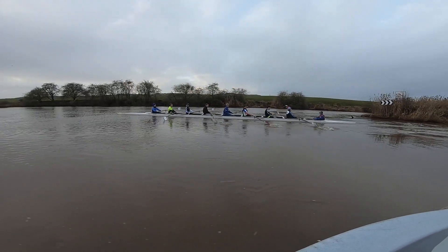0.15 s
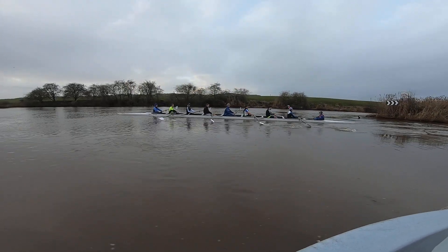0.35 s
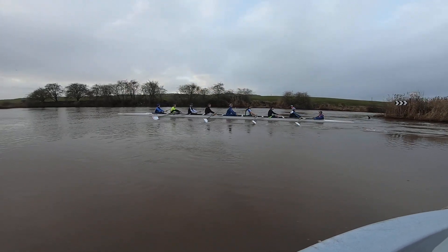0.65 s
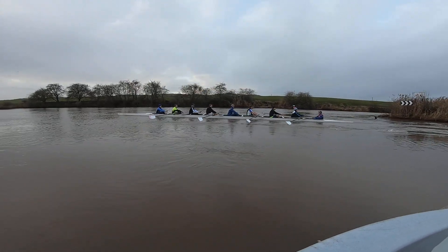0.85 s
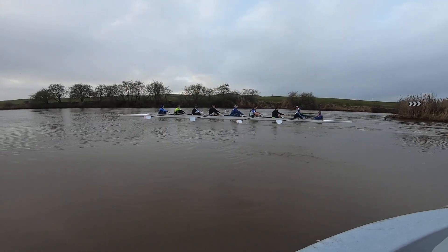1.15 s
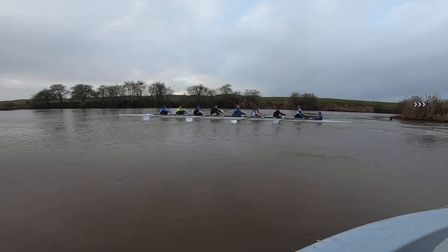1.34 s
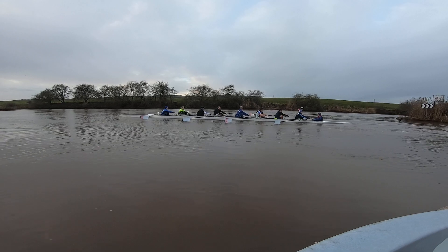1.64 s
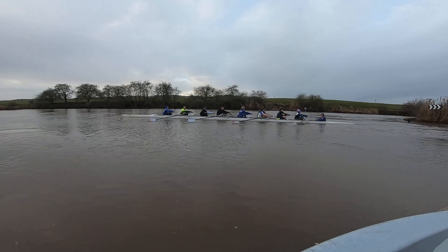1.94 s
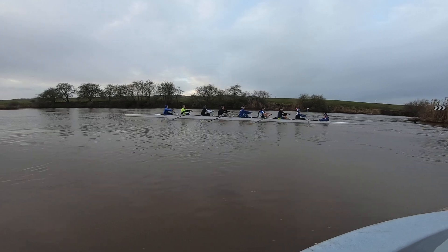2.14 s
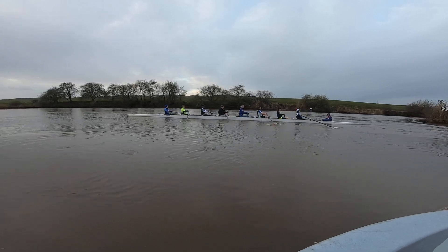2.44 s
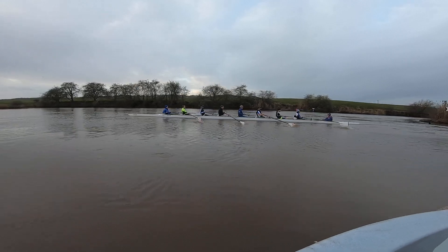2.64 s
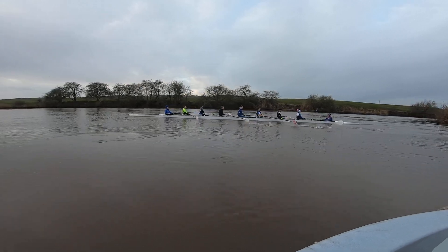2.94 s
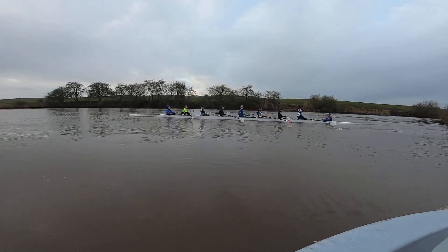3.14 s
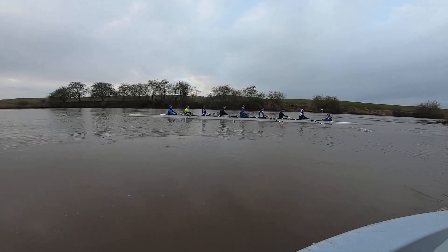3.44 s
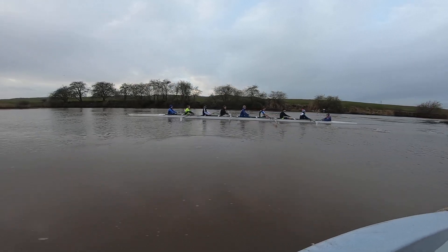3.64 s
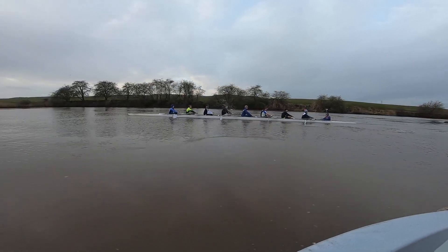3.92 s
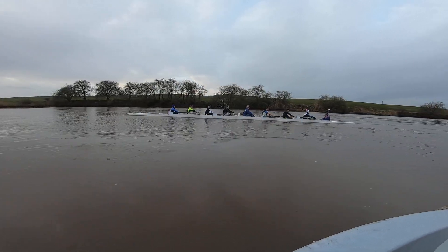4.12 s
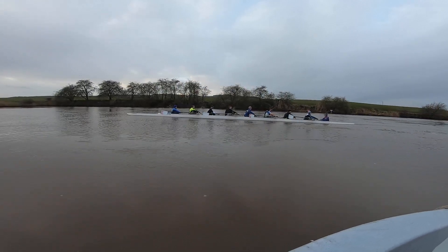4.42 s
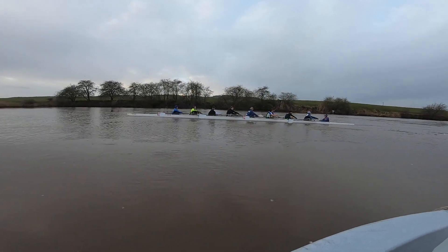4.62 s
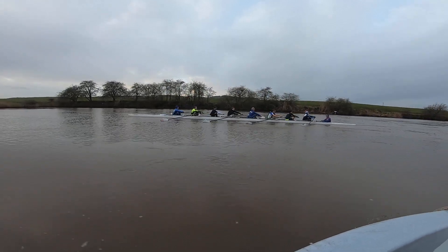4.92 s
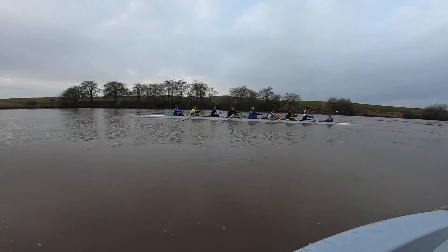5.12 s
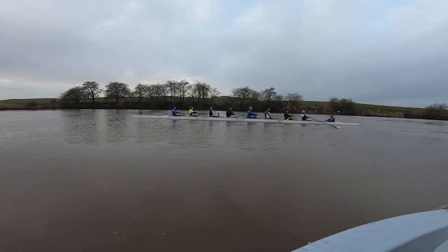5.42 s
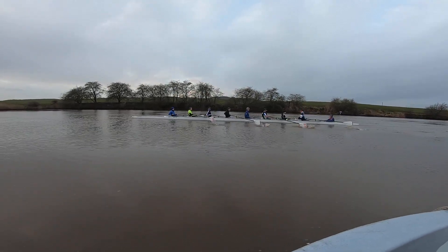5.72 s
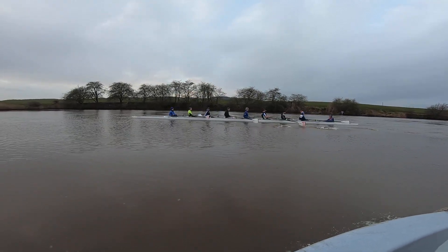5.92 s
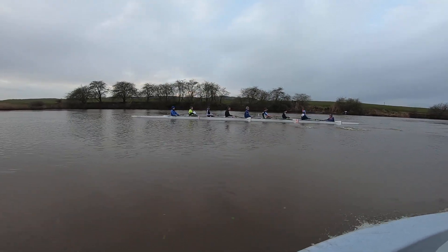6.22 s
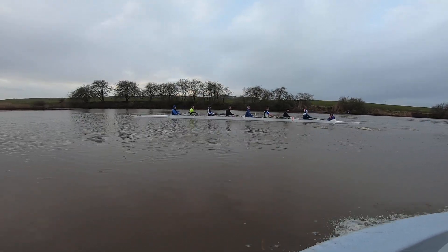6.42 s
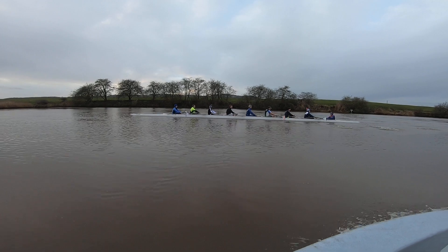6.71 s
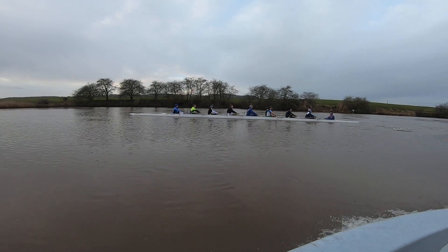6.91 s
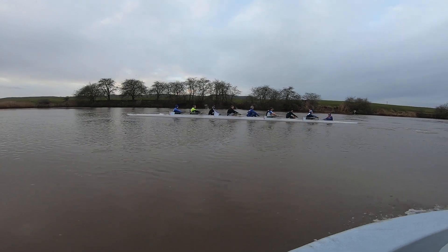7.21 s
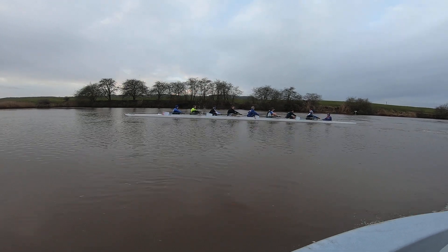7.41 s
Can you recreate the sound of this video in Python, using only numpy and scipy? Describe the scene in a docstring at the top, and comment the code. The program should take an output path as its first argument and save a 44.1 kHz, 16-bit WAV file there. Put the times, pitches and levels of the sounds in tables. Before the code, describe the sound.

Heard from aboard a motorboat: an even droning engine, short buffets of low wind, a soft wake hiss and a few close drops of spray.

```python
"""An outboard engine on a calm river, heard in the boat: five firing orders as phase-locked sines,
weak extra lines (half orders from unequal cylinders and a faint sixth order), and the propeller's beat.
Wind rumbles on the microphone port: three bands of low noise, lifted by short gusts.
The wake rushes along the hull: noise plus bubbles in three bands. A few drops of spray patter close by,
each a damped ring with short noise bursts."""
import sys
import numpy as np
from scipy import signal
from scipy.fft import rfft, irfft, next_fast_len
from scipy.io import wavfile
from scipy.ndimage import uniform_filter1d, map_coordinates

SR = 44100
rng = np.random.default_rng(int(sys.argv[2]) if len(sys.argv) > 2 else 0)


def file_out(sig):
    """Save sig as 16-bit WAV at sys.argv[1]."""
    # one column per channel
    cols = np.atleast_2d(sig).T
    # limit, then scale
    lim = np.clip(cols, -1, 1)
    pcm = np.round(lim * 32767).astype(np.int16)
    wavfile.write(sys.argv[1], SR, pcm)


N = 333396


def amp(db):
    """dB to gain."""
    return 10 ** (np.asarray(db) / 20)


def unit(x):
    """Scaled to rms 1."""
    return x / np.sqrt(np.mean(x ** 2) + 1e-20)


def curves(rows):
    """One value per sample for each column after the time."""
    knot_s, *columns = np.transpose(rows)
    return [np.interp(np.arange(N) / SR, knot_s, column) for column in columns]


def wobble(rate_hz):
    """Smooth random curve through rate_hz normal knots a second."""
    knots = rng.standard_normal(int(N * rate_hz / SR) + 4)
    return map_coordinates(knots, [np.arange(N) * rate_hz / SR])


def filtered(x, response):
    """x times a zero-phase response of frequency."""
    m = next_fast_len(N + 8192)
    return irfft(rfft(x, m) * response(np.fft.rfftfreq(m, 1 / SR)), m)[..., :N]


def coloured(x, points):
    """x through (frequency [Hz], gain [dB]) points on a log axis, then rms 1."""
    hz_points, db_points = np.transpose(points)

    def response(hz):
        return amp(np.interp(np.log(hz + 1), np.log(hz_points + 1), db_points))

    return unit(filtered(x, response))


def patchy(depth_db):
    """White noise with time-frequency patches of random gain."""
    z = signal.stft(rng.standard_normal(N + 512), nperseg=512)[2]
    field = uniform_filter1d(rng.standard_normal(z.shape), size=8, axis=0)
    field = uniform_filter1d(field, size=12, axis=1)
    return signal.istft(z * amp(depth_db * unit(field)), nperseg=512)[1][:N]


def bubbles(count, hz, spread, cycles, scatter_db):
    """Random bubbles: short damped sines whose pitch rises as they surface."""
    draw = rng.random((count, 2))
    pitch_hz = hz * np.exp(spread * rng.standard_normal((count, 1)))
    i = np.arange(400)
    u = i * pitch_hz / SR / cycles
    wave = np.sin(2 * np.pi * cycles * (u + 0.088 * u * u)) * u * np.exp(-3 * u)
    wave = wave * amp(-scatter_db * np.log(1 - .98 * draw[:, 1:]))  # a few much louder
    at = (draw[:, :1] * N).astype(int) + i
    return unit(np.bincount(at.ravel(), wave.ravel(), N + 400)[:N])


# Engine firing rate: (time [s], rate [Hz])
FIRING_RATE = [(0, 66.22), (.5, 66.2), (1.65, 66.14), (2.45, 64.77), (3.9, 63.8), (4.6, 64.3), (5.1, 63.92),
               (6.4, 63.38), (7.3, 63.37), (7.56, 63.7)]


def engine():
    """All lines run on one firing phase, the integral of the firing rate plus slight jitter."""
    turn = 2 * np.pi * (np.cumsum(curves(FIRING_RATE)[0]) / SR + .012 * wobble(12))
    return np.sqrt(2) * (firing_orders(turn) + weak_orders(turn) + propeller(turn))  # rms to peak


def exhaust_lag(order):
    """Phase [rad]: the exhaust delays the high orders more than the low ones."""
    return 1.1 - .52 * (order - 1) ** 2


# First order, swelling as the boat rocks: (time [s], level [dB])
FIRST_ORDER = [(0, -23.5), (.3, -20.5), (.85, -20.5), (1.05, -23), (1.65, -21.5), (1.98, -16.5),
               (2.5, -17.5), (2.9, -20), (3.25, -17), (3.62, -15.5), (3.85, -21), (4.12, -16.5),
               (4.17, -22), (4.75, -20.5), (4.9, -18), (5.3, -18), (5.75, -20), (6.1, -20), (6.45, -17.5),
               (7.1, -18), (7.27, -22), (7.56, -19.5)]
# Upper orders: (time [s], third level [dB], fourth level [dB], fifth level [dB])
UPPER_ORDERS = [(0, -31.5, -33, -35.5), (.7, -31, -33, -35.5), (1.15, -27, -27, -34),
                (1.75, -25, -25.5, -35), (2.4, -24.5, -28.5, -34), (2.85, -24, -35.5, -44),
                (3.75, -22.5, -33.5, -41.5), (4.5, -28.5, -30.5, -38.5), (4.9, -25, -32, -41),
                (5.35, -30, -31, -39), (6.2, -28, -36.5, -41), (6.65, -21.5, -34, -37.5),
                (7.15, -27, -26, -34.5), (7.56, -26, -26, -32.5)]
# Depth of each order's own slow waver, orders 1 to 5: (depth [dB])
ORDER_WAVER = [.4, 1, .8, 1, 1.2]
SECOND_MEAN_DB, SECOND_SHARE = -24, 0.53  # share of the first order's swells, in dB
SINK_DB_PER_GUST_DB = 0.56


def firing_orders(turn):
    """Harmonics 1 to 5 of the firing rate, each wavering; the first sinks in gusts."""
    first, third, fourth, fifth = curves(FIRST_ORDER) + curves(UPPER_ORDERS)
    second = SECOND_MEAN_DB + SECOND_SHARE * (first - first.mean())
    first = first - SINK_DB_PER_GUST_DB * gusts()
    out = np.zeros(N)
    levels_db = (first, second, third, fourth, fifth)
    for order, (level_db, depth_db) in enumerate(zip(levels_db, ORDER_WAVER), 1):
        waver_db = depth_db * wobble(6) + 0.75 * wobble(16)
        out += amp(level_db + waver_db) * np.cos(order * turn + exhaust_lag(order))
    return out


# Common level of the weak orders: (time [s], level [dB])
WEAK_LEVEL = [(0, -35.5), (0.8, -40), (1.2, -33), (2, -33), (2.6, -46.5), (3.2, -36.5), (3.6, -46.5),
              (4.2, -48), (5.2, -44.5), (5.6, -43), (6.2, -46.5), (6.8, -46), (7.56, -44.5)]
# Half orders and the sixth: (multiple of firing rate, level over the common one [dB])
WEAK_ORDERS = [(2.5, -4.5), (3.5, 5), (4.5, -3), (5.5, -24.5), (6, -20.5)]


def weak_orders(turn):
    """Weak extra engine lines: half orders from unequal cylinders, and a faint sixth order."""
    common_db = curves(WEAK_LEVEL)[0]
    out = np.zeros(N)
    for order, db in WEAK_ORDERS:
        level = amp(common_db + db + 2.1 * wobble(3.5))
        out += level * np.cos(order * turn + exhaust_lag(order) + 1.2 * wobble(4))
    return out


# Propeller beat: (time [s], level [dB])
BLADE_BEAT = [(0, -40), (0.4, -28), (1.1, -34.5), (2, -26.5), (2.9, -40), (3.6, -33), (4.2, -38),
              (5.2, -29.5), (5.7, -37), (6.8, -31.5), (7.56, -42)]
BLADE_ORDER = 1.4  # multiple of firing rate


def propeller(turn):
    """The geared propeller adds one line at its own multiple, wavering in level and phase."""
    level = amp(curves(BLADE_BEAT)[0] + 0.96 * wobble(2.4))
    return level * np.sin(BLADE_ORDER * turn + 0.62 * wobble(5.9))


# Wind gusts: (centre [s], rise [dB], bell sigma [s])
GUST_BELLS = [(.06, 1, 0.035), (.21, 3, .04), (.98, 4, .06), (1.22, 4.5, 0.038), (2.203, 4, .08),
              (2.801, 2.5, 0.066), (3.582, 5, .06), (3.751, 7.5, 0.042), (5.013, 8, .05), (5.62, 7, .05),
              (5.861, 10, 0.045), (6.87, 3.5, 0.12)]


def gusts():
    """Rise of the wind in dB: one short Gaussian bell per gust."""
    t = np.arange(N) / SR
    return sum(db * np.exp(-.5 * ((t - s) / sigma_s) ** 2) for s, db, sigma_s in GUST_BELLS)


# Wind strength: (time [s], level [dB])
WIND_STRENGTH = [(0, -27), (1.3, -28.5), (2.5, -30), (4.4, -30), (5.7, -29.5), (7.56, -30)]
# Lowest band's spectrum: (frequency [Hz], relative density [dB per Hz])
THUD_SPECTRUM = [(1, -20.5), (8, -7), (25, -4), (40, -0.5), (55, -13), (100, -49.5), (300, -120)]
# Middle band's spectrum: (frequency [Hz], relative density [dB per Hz])
RUMBLE_SPECTRUM = [(20, -62), (42, -13.5), (56, 0.5), (100, 2.5), (160, 1), (190, -14), (300, -52),
                   (600, -120)]
# Highest band's spectrum: (frequency [Hz], relative density [dB per Hz])
ROAR_SPECTRUM = [(60, -59), (150, -14.5), (180, 0.5), (250, -2), (330, -8), (380, -15), (480, -27),
                 (700, -45.5), (1500, -120)]
THUD_DB, RUMBLE_DB, ROAR_DB = -5.5, 0.75, -0.67  # over the strength
THUD_GUST_SHARE, ROAR_GUST_SHARE = .4, 0.68  # of a gust's rise in dB


def wind():
    """Air past the microphone port: slightly lumpy noise in three low bands, rising together in gusts."""
    strength_db, gust_db = curves(WIND_STRENGTH)[0], gusts()

    def band(level_db, spectrum):
        lumpy = amp(0.1 * wobble(19)) * rng.standard_normal(N)
        return amp(strength_db + level_db) * coloured(lumpy, spectrum)

    thud_db = THUD_DB + THUD_GUST_SHARE * gust_db + 2.9 * wobble(7.7)
    rumble_db = RUMBLE_DB + gust_db + 1.5 * wobble(4.7)
    roar_db = ROAR_DB + ROAR_GUST_SHARE * gust_db
    return band(thud_db, THUD_SPECTRUM) + band(rumble_db, RUMBLE_SPECTRUM) + band(roar_db, ROAR_SPECTRUM)


# Low water band: (time [s], gurgle level [dB])
GURGLE_LEVEL = [(0, -44), (.25, -42.5), (.9, -45.5), (1.9, -41), (2.3, -43.5), (3.4, -43.5), (3.7, -44.5),
                (4.2, -43), (5, -42), (5.2, -42.5), (5.85, -44), (6.05, -46.5), (6.5, -46), (7, -43),
                (7.56, -45)]
# Upper water bands: (time [s], rush level [dB], fizz level [dB])
RUSH_FIZZ_LEVELS = [(0, -45, -57.5), (.7, -46.5, -56.5), (.85, -47.5, -59.5), (1.25, -43.5, -58.5),
                    (1.65, -42, -58.5), (1.95, -42.5, -58), (2.15, -45.5, -60), (2.45, -46.5, -60),
                    (2.7, -44, -58.5), (3.1, -45.5, -57), (3.75, -44, -60.5), (4.2, -45.5, -58.5),
                    (4.6, -44.5, -57), (5, -44.5, -58), (5.2, -46, -57.5), (5.8, -43.5, -54.5),
                    (6.2, -44, -54.5), (6.45, -39.5, -51.5), (6.7, -40.5, -53.5), (7, -42, -52.5),
                    (7.2, -45, -56), (7.56, -44.5, -56)]
# Gurgle spectrum: (frequency [Hz], relative density [dB per Hz])
GURGLE_SPECTRUM = [(150, -40.5), (350, -4.5), (500, -1), (700, -3), (1000, -5.5), (1250, -10), (1800, -30),
                   (4000, -120)]
# Rush spectrum: (frequency [Hz], relative density [dB per Hz])
RUSH_SPECTRUM = [(500, -38.5), (1050, -13), (1300, -3.5), (1600, -2), (2500, -2.5), (3400, -5), (4000, -13),
                 (4800, -20.5), (6000, -46), (9000, -120)]
# Fizz spectrum: (frequency [Hz], relative density [dB per Hz])
FIZZ_SPECTRUM = [(1500, -62), (3300, -3), (4200, -3), (5050, -3), (5550, -11.5), (7000, -11), (8300, -13.5),
                 (9500, -20.5), (10500, -21.5), (12000, -31), (13500, -41.5), (16000, -120)]


def wake():
    """Water along the hull: noise with bubbles on it, surging together in all bands."""
    gurgle_db, rush_db, fizz_db = curves(GURGLE_LEVEL) + curves(RUSH_FIZZ_LEVELS)
    surge = wobble(8.2) + 1.1 * wobble(25) + 0.54 * wobble(4.1)
    gurgle = unit(patchy(depth_db=0.2))
    gurgle += 0.15 * bubbles(count=3000, hz=694, spread=.4, cycles=5.6, scatter_db=2.0)
    rush = unit(patchy(depth_db=0.0))
    rush += 0.2 * bubbles(count=5000, hz=2625, spread=0.458, cycles=5.86, scatter_db=2.0)
    fizz = unit(patchy(depth_db=0.3))
    fizz += .3 * bubbles(count=6000, hz=5940, spread=.35, cycles=5.1, scatter_db=3.0)
    out = amp(gurgle_db + 0.16 * surge) * coloured(gurgle, GURGLE_SPECTRUM)
    out += amp(rush_db + 0.39 * surge) * coloured(rush, RUSH_SPECTRUM)
    out += amp(fizz_db + 0.57 * surge) * coloured(fizz, FIZZ_SPECTRUM)
    return out


# Spray drops: (time [s], level before trim [dB], ring pitch [Hz], tick level before trim [dB])
SPRAY_DROPS = [(0.0962, -31.5, 4330, -16), (0.181, -30, 3520, -13), (0.2334, -28.5, 3430, -22),
               (0.3531, -31, 3160, -18), (0.4813, -27, 3430, -21), (0.5317, -39, 2130, -20),
               (0.5873, -35, 4870, -21), (0.711, -34.5, 4203, -17), (2.666, -30, 2800, -27),
               (5.7702, -28, 2644, -21)]
DROP_TRIM_DB, SPLASH_TRIM_DB, TICK_TRIM_DB = -3.5, 4.0, 2


def spray():
    """Each drop rings at its own pitch inside a short splash and a higher tick of noise."""
    out, t = np.zeros(N + SR), np.arange(SR // 10) / SR
    rise = 1 - np.exp(-t / 0.0012)

    def band(x, low_hz, high_hz):
        return signal.sosfilt(signal.butter(4, [low_hz, high_hz], "band", fs=SR, output="sos"), x)

    def decay(start_db, t60_s):
        return amp(start_db - 60 * t / t60_s)

    for s, db, hz, tick_db in SPRAY_DROPS:
        noise = rng.standard_normal((2, len(t)))
        ring = np.sin(2 * np.pi * hz * t) * decay(0, t60_s=0.055)
        splash = band(noise[0], low_hz=900, high_hz=4380) * decay(SPLASH_TRIM_DB, t60_s=0.047)
        tick = band(noise[1], low_hz=4500, high_hz=8500) * decay(tick_db + TICK_TRIM_DB, t60_s=.035)
        drop = rise * (0.39 * ring + splash + tick)
        out[round(s * SR):][:len(t)] += amp(db + DROP_TRIM_DB) * drop
    return out[:N]


def scene():
    """All sources at one microphone."""
    return (engine() + wind() + wake() + spray())[None]


BAND_LIMIT_HZ = 14000


def record(dry):
    """Sharp band limit: nothing passes at or above it."""
    return filtered(dry, lambda hz: hz < BAND_LIMIT_HZ)


dry = scene()
out = record(dry)
file_out(out)
```